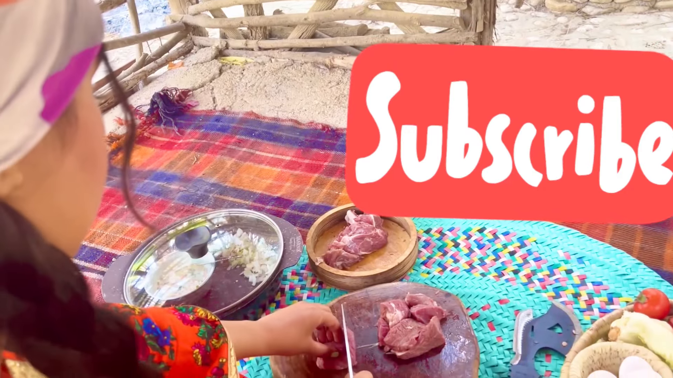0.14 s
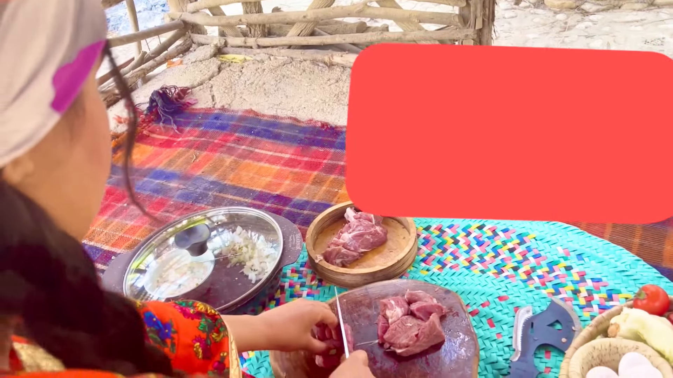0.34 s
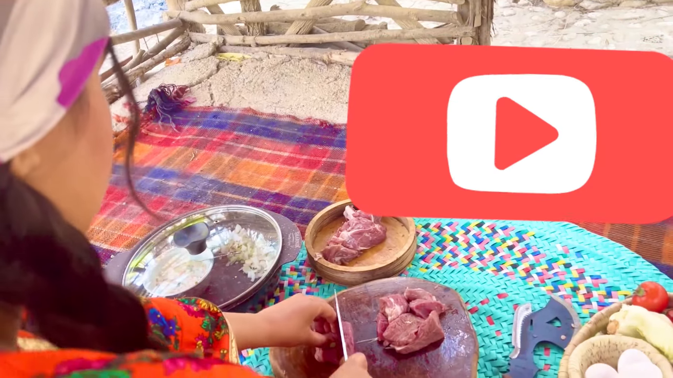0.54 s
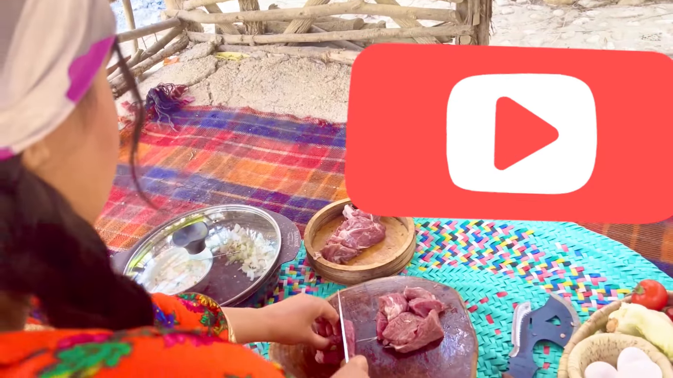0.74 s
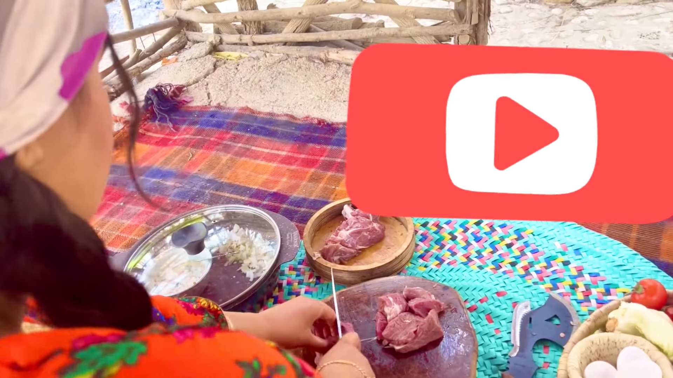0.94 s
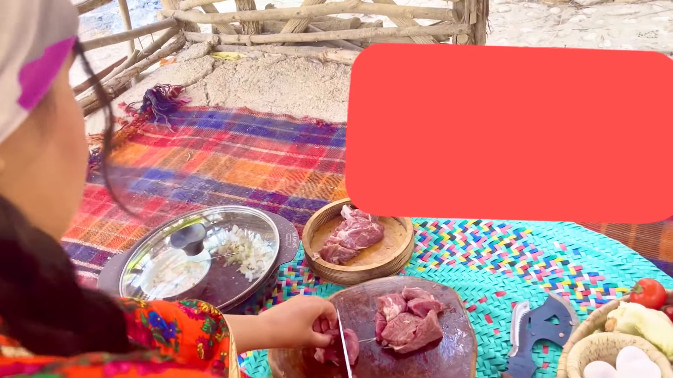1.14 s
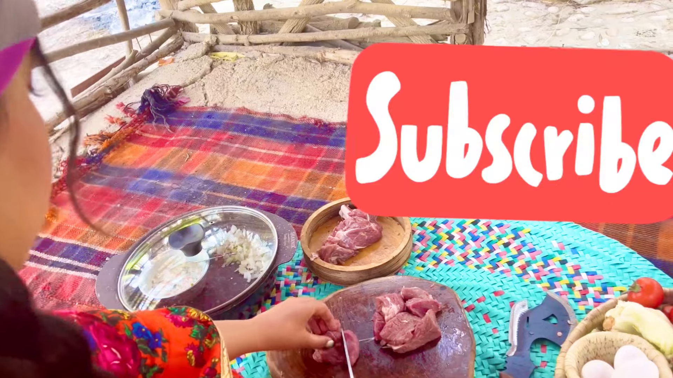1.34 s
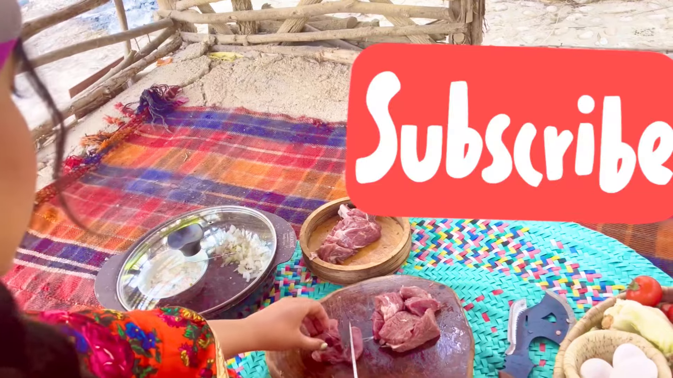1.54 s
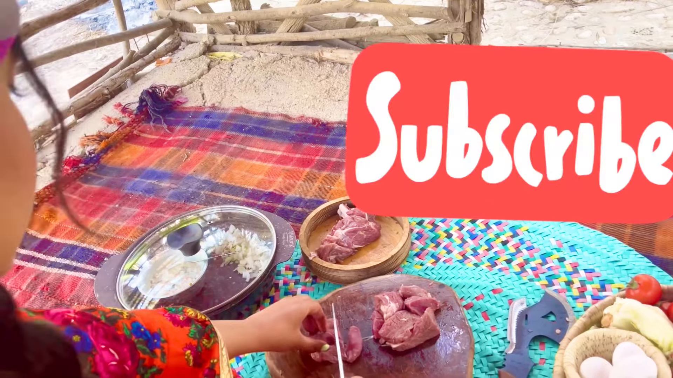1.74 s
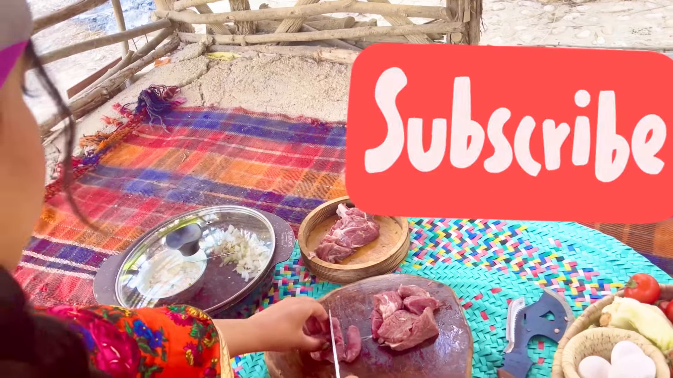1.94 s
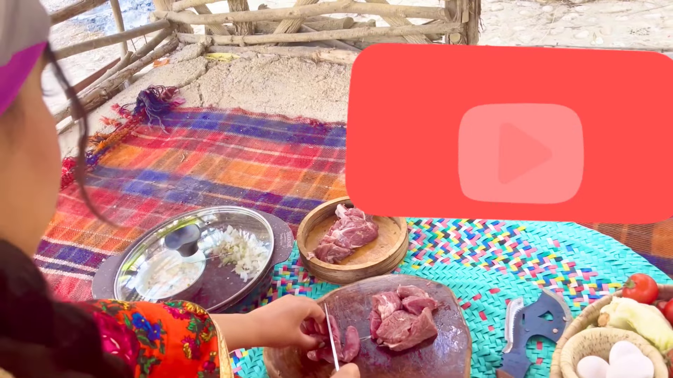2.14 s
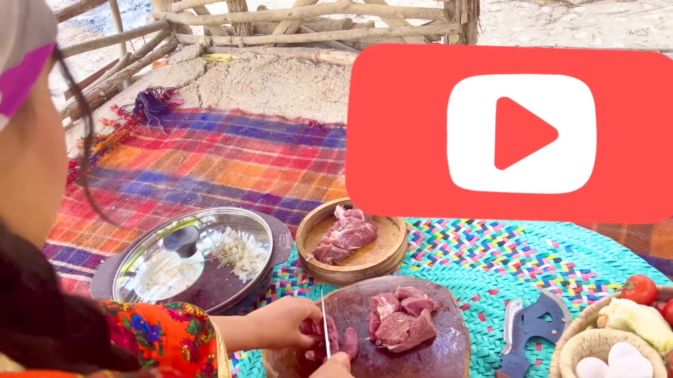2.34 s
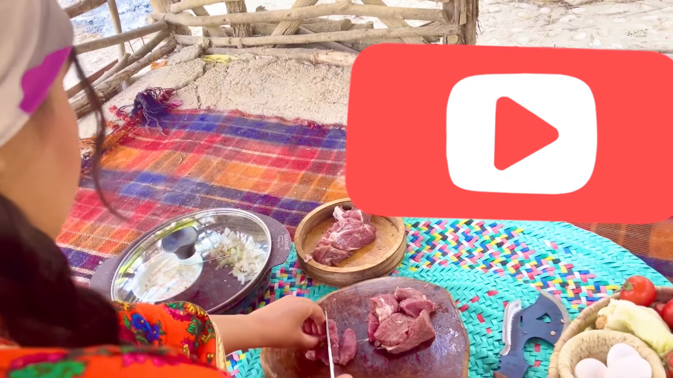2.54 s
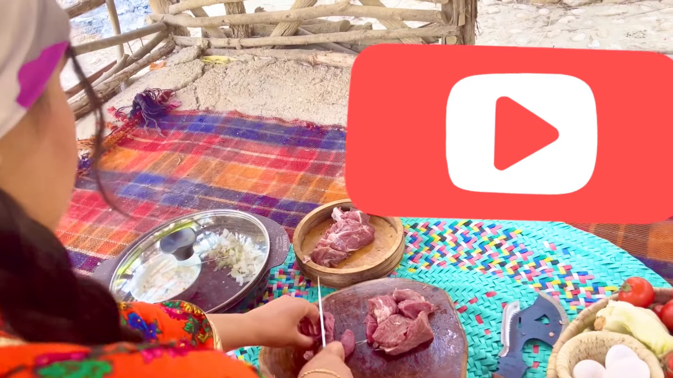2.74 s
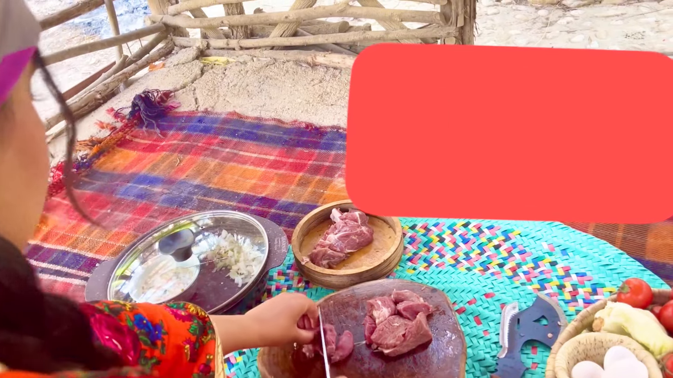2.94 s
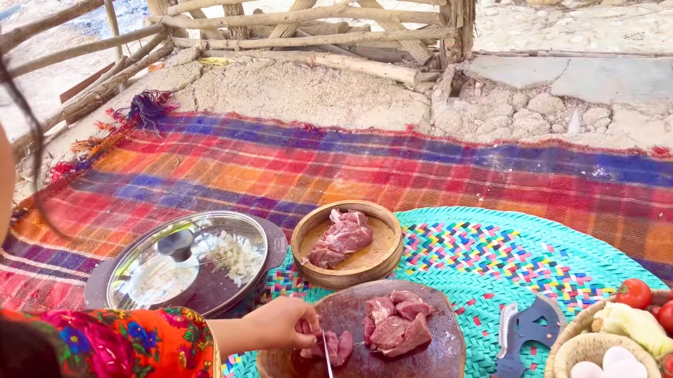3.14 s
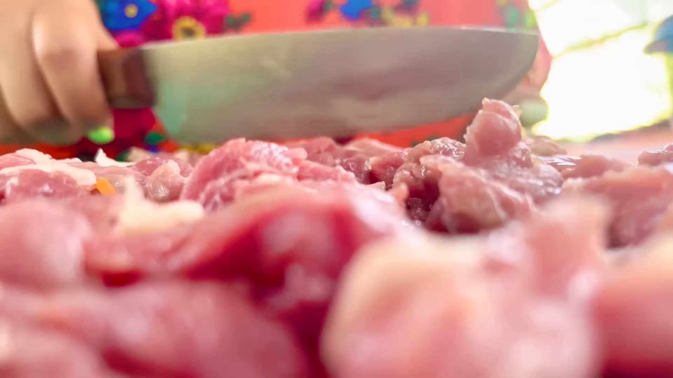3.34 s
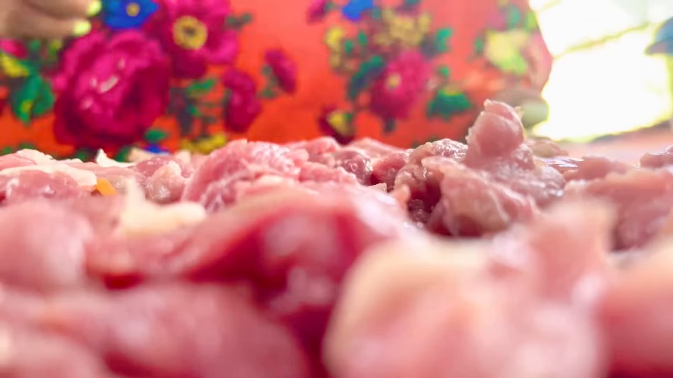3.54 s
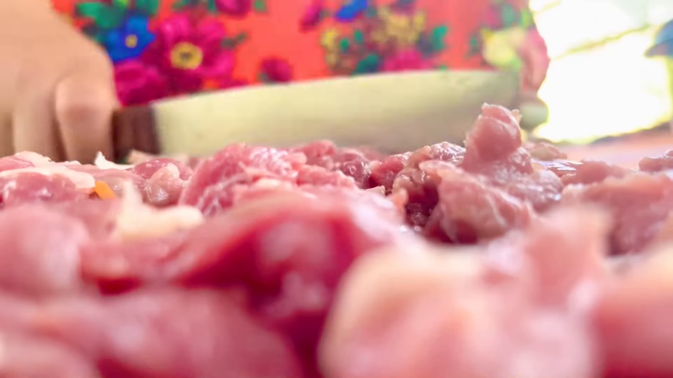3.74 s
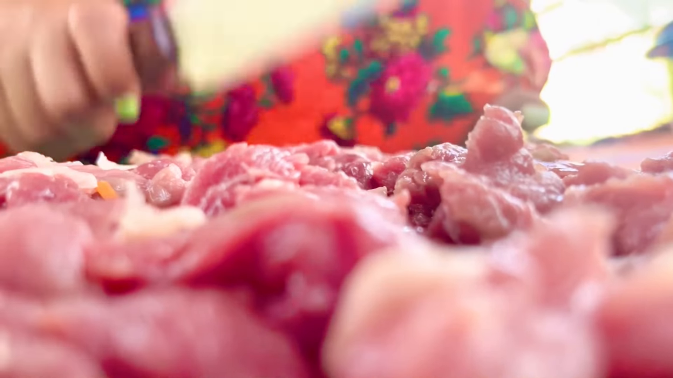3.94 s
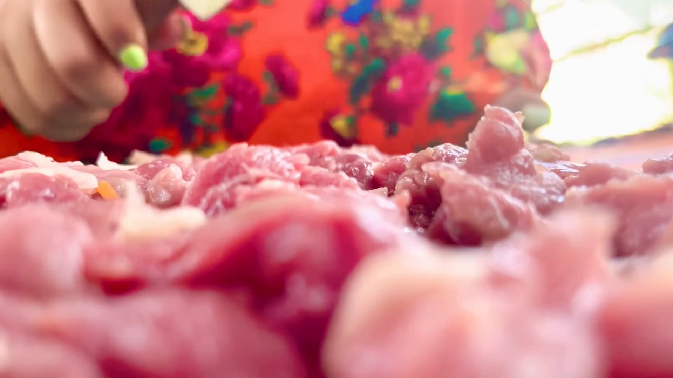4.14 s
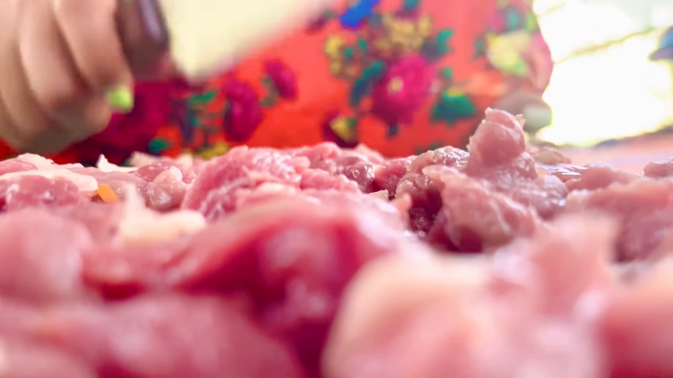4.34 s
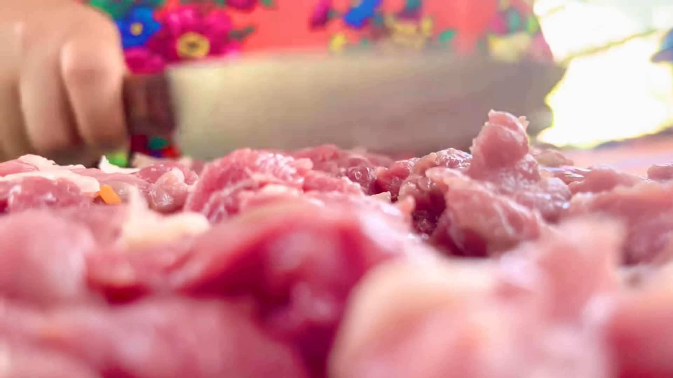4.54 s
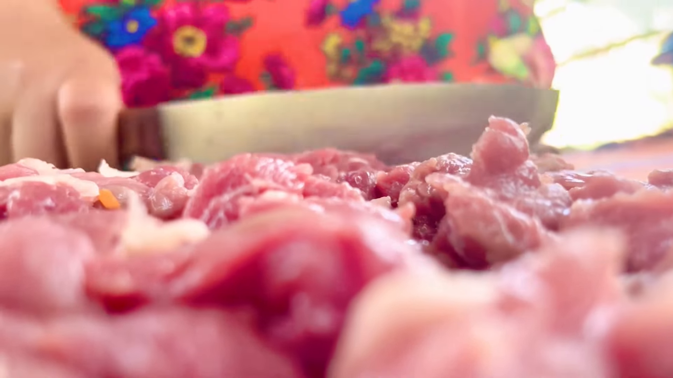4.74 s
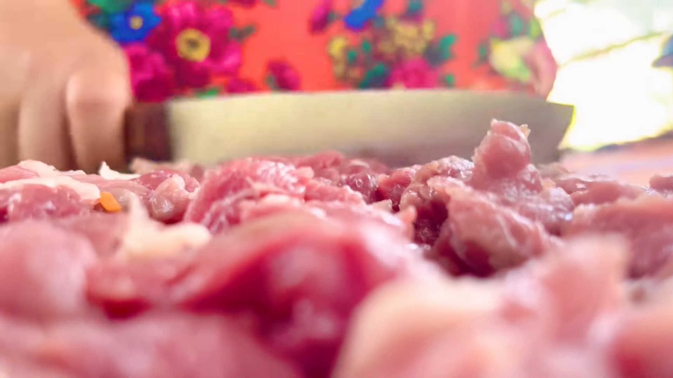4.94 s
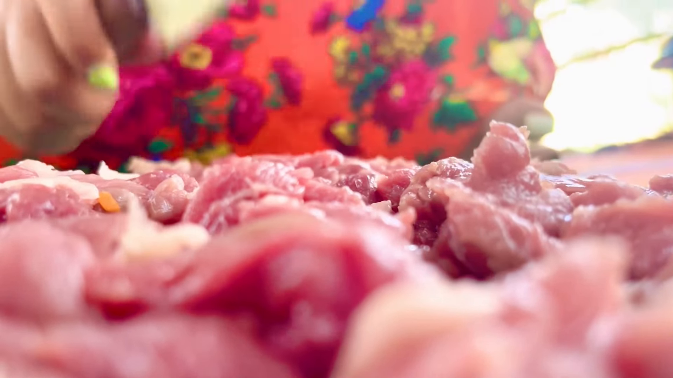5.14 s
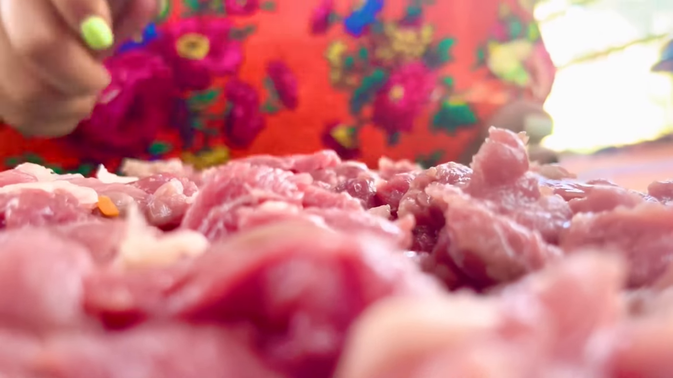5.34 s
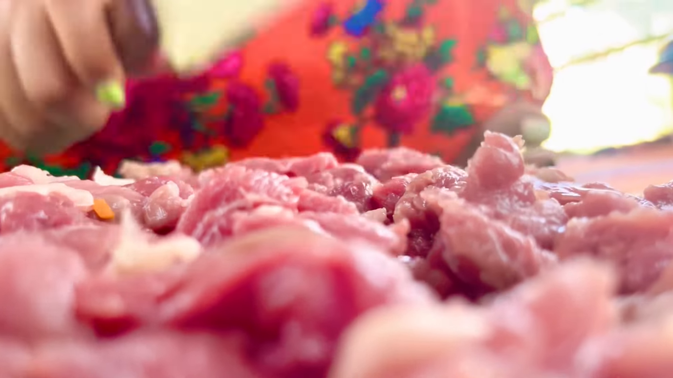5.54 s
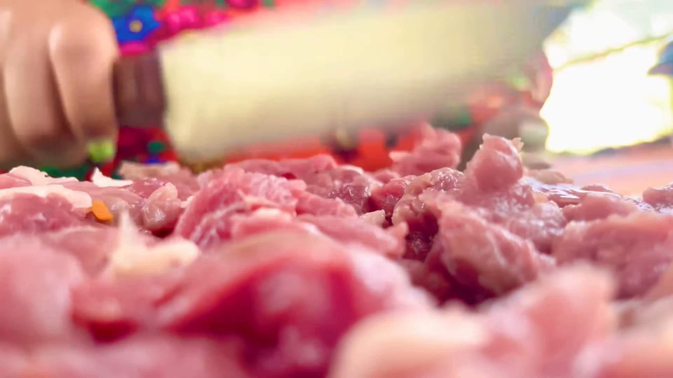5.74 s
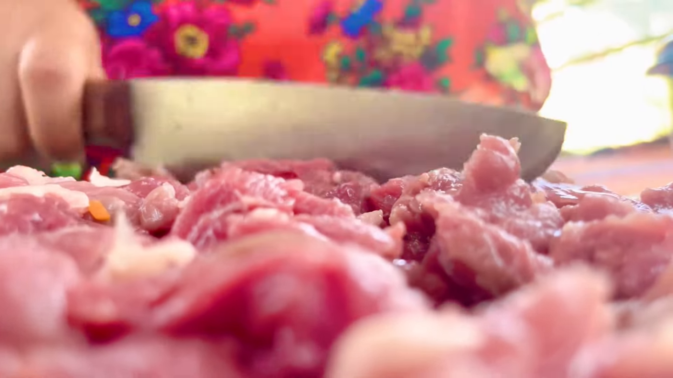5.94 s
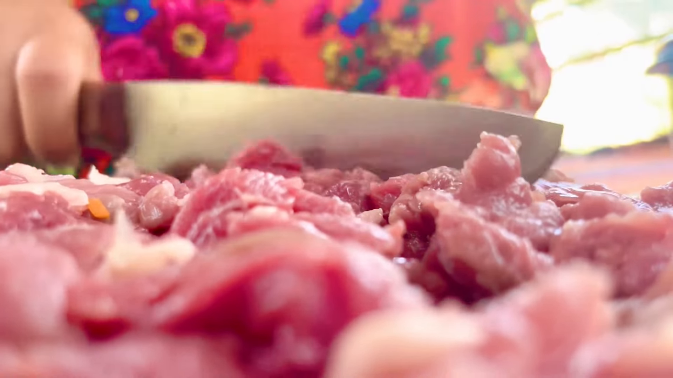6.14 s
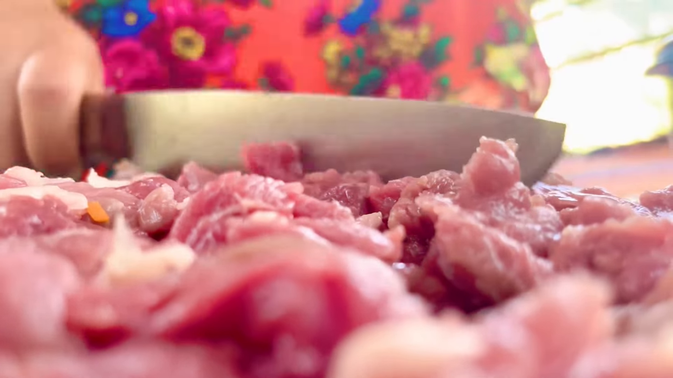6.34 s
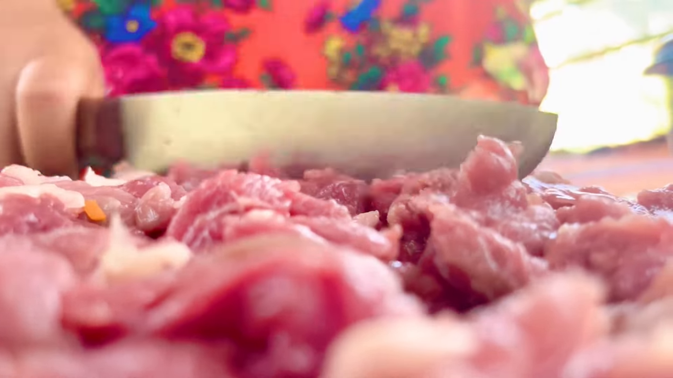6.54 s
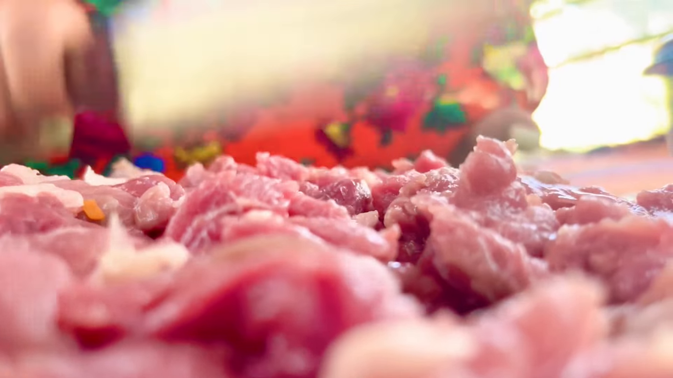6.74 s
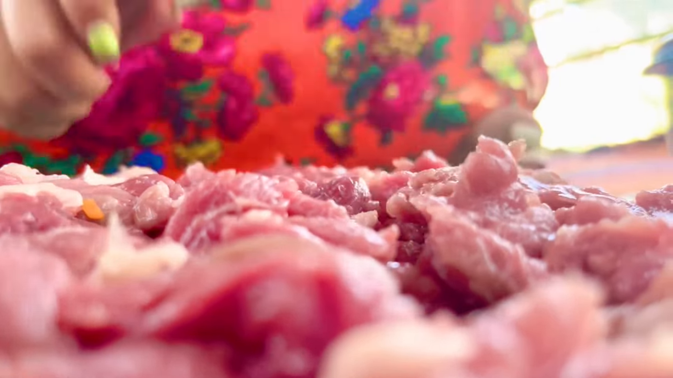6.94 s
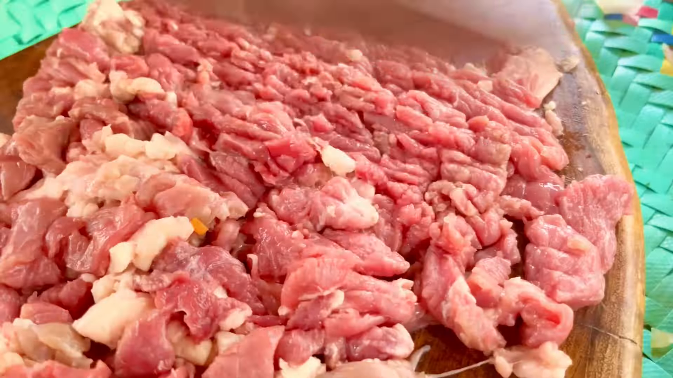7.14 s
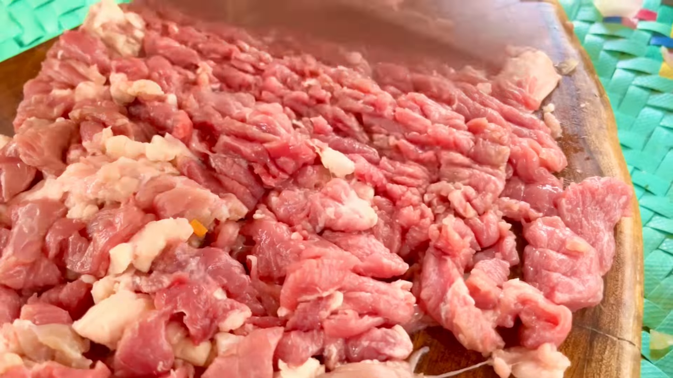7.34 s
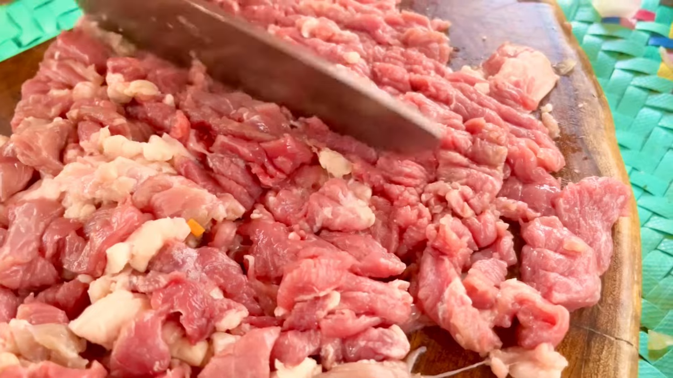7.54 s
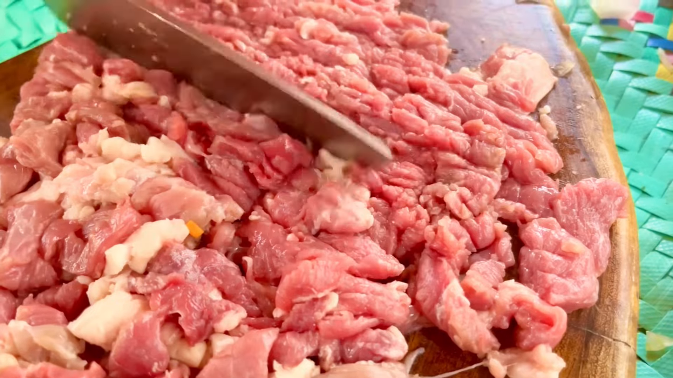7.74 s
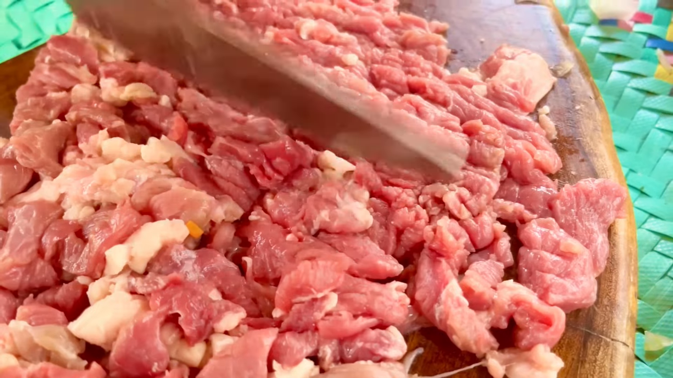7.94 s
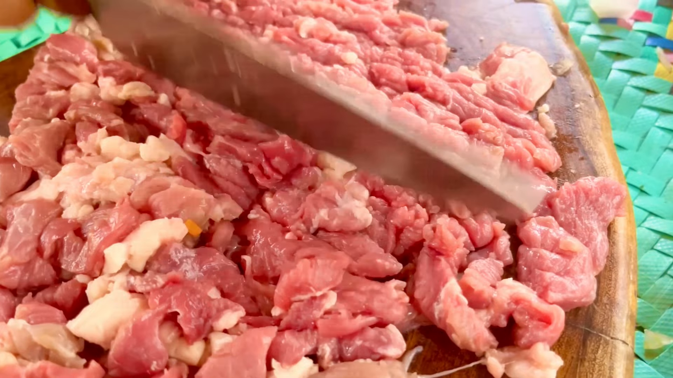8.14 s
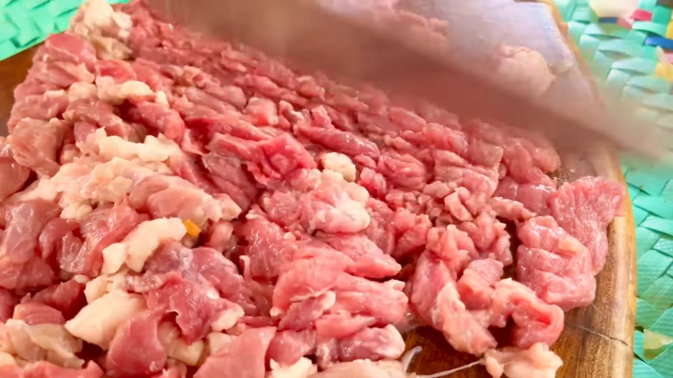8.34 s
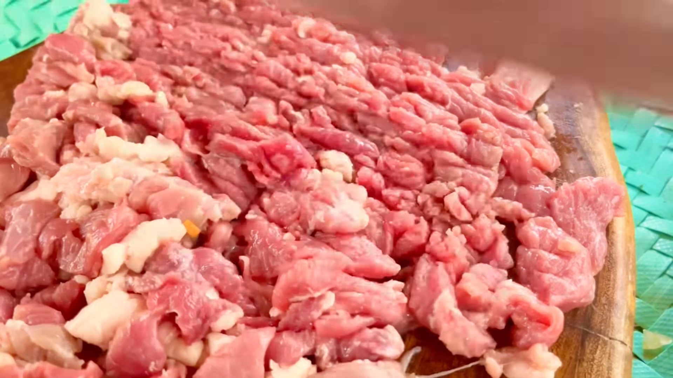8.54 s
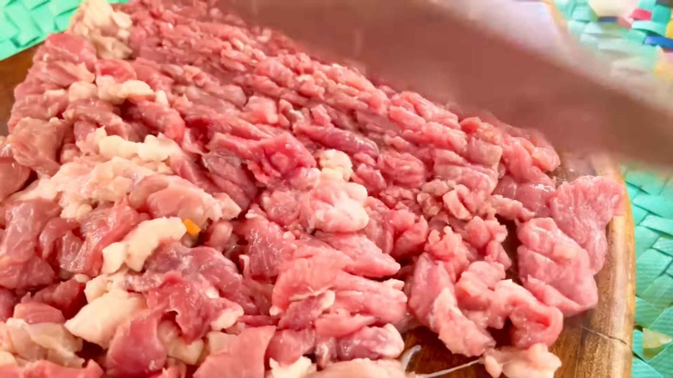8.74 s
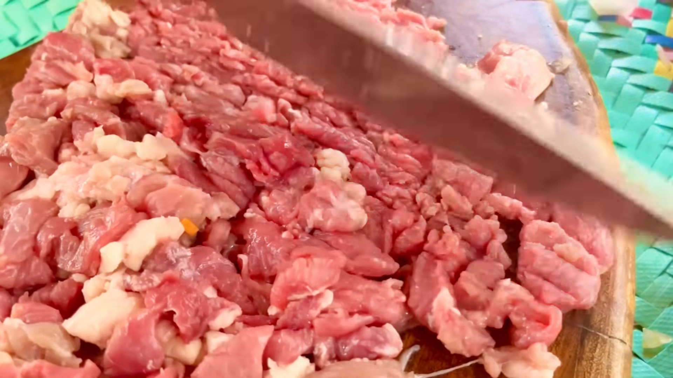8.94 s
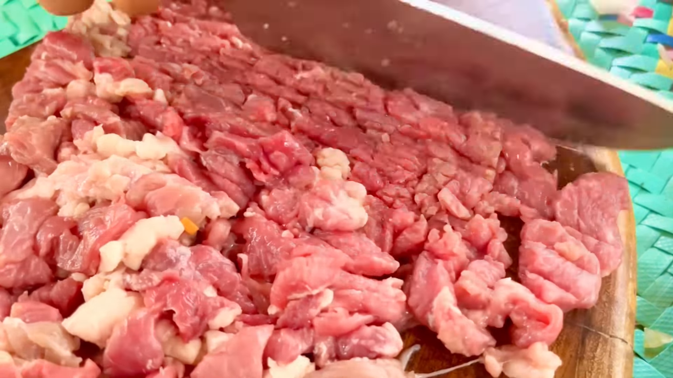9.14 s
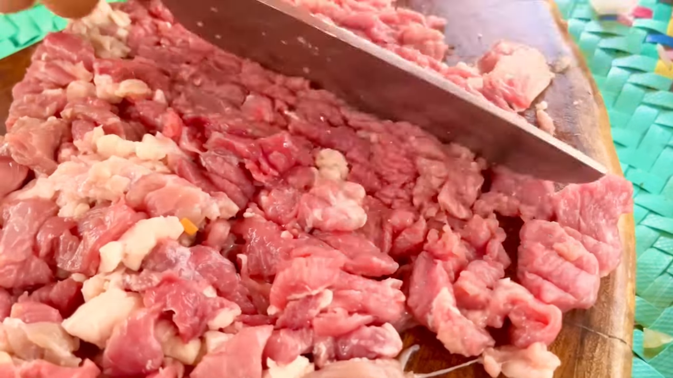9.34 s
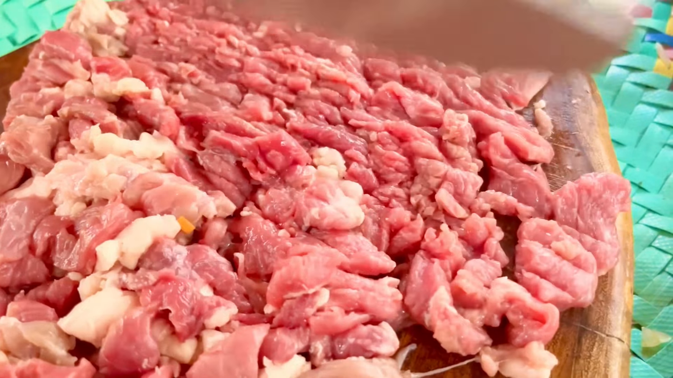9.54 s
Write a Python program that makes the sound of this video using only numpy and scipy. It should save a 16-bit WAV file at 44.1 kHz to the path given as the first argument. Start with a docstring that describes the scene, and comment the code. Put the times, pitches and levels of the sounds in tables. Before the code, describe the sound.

Faint slicing rubs and bird chirps outdoors give way to loud, steady knife chops, some cracking on wood, others thudding softly into wet meat.

```python
"""Knife on a meat board

A big knife saws through raw meat on a thick wooden board, then minces it with quick, even chops.
Some chops reach the wood, whose damped modes knock; others end in the meat with a wet slap of
shaped noise and a low bump of the board on its mat, a falling sine. Strokes are noise driven by blade speed.
A small bird, gliding sines, calls outside the open shelter. Two microphones stand close to the board.
"""
import sys
import numpy as np
from scipy import signal
from scipy.fft import rfft, irfft
from scipy.io import wavfile
from scipy.ndimage import uniform_filter1d

SR = 44100
rng = np.random.default_rng(int(sys.argv[2]) if len(sys.argv) > 2 else 0)


def transcribe(u):
    """Save the signal u as a 16-bit wav file named by the first command-line argument.

    u: samples, shape (n,) or (channels, n), limited to [-1, 1]; the rate is SR.
    q: integer samples, one column per channel.
    """
    v = np.clip(np.atleast_2d(u).T, -1, 1)
    q = np.round(v * 32767).astype(np.int16)
    wavfile.write(sys.argv[1], SR, q)


N = 427769  # samples
HZ = np.fft.rfftfreq(N, 1 / SR)

# All levels are relative: the functions add their own trims. Spectra give dB per Hz.
# gain curve applied to the whole outdoor background: time_s, gain_db
BACKGROUND_GAIN = [(0, -55), (4.1, -57.5), (4.6, -67.5), (6.8, -73.5), (7.4, -64), (9.7, -69.5)]
# spectra of the background's rumble and wash: frequency_hz, level_db
RUMBLE_SPECTRUM = [(12, -36), (20, -6), (43, -1.5), (66, -1), (108, -9.5), (145, -17), (193, -19),
                   (300, -31.5), (390, -62.5), (660, -120)]
WASH_SPECTRUM = [(150, -7.5), (300, 1.5), (700, 2.5), (1400, -7), (2500, -16), (4000, -13.5), (6000, -17),
                 (9500, -20), (12000, -29.5), (16000, -37)]
# likeness of left and right in steady noise: frequency_hz, correlation (0-1)
STEREO_LIKENESS = [(60, 1), (130, 0.25), (290, 0.96), (640, 0.051), (1400, 0.37), (3000, 0)]

# falling bird whistles: start_s, length_s, top_pitch_hz, shoulder_pitch_hz, level_db, run_up_s
BIRD_WHISTLES = [(.143, 0.094, 5170, 3330, -62.5, .004), (1.752, 0.061, 5670, 4040, -59, .04),
                 (1.976, .08, 4770, 3466, -62.5, .004)]
# soft level bird peeps: start_s, length_s, level_db
BIRD_PEEPS = [(0, .035, -71), (.045, 0.037, -68), (0.472, 0.045, -77), (1.914, .05, -71), (3.52, 0.13, -67),
              (3.879, 0.055, -76.5), (5.975, .13, -87), (7.84, 0.11, -79)]
PEEP_HZ = 3890
# a soft run-up climbs to the top pitch: share of pitch gained, level against the whistle in dB
RUN_UP, RUN_UP_DB = 0.25, -13
# slide to the shoulder, then drop: share of the length, bend of the slide, share of pitch lost
SHOULDER_AT, SLIDE_BEND, DROP = 0.8, 1.9, 0.266

# sawing and dragging strokes: middle_s, length_s, hiss_db (blade in meat), rub_db (carried by the board)
KNIFE_STROKES = [(0.33, 0.35, -68, -69.5), (0.568, 0.29, -69, -67.5), (0.829, 0.22, -60, -45),
                 (1.071, 0.3, -57, -43.5), (1.257, 0.62, -66.5, -59), (2.2, 0.35, -68, -70),
                 (2.448, 0.27, -69, -66), (2.673, 0.29, -63, -57), (2.953, 0.36, -59.5, -46),
                 (3.18, 0.46, -77.5, -73.5), (3.485, 0.45, -75, -95), (9.49, 0.22, -68.5, -98)]
# spectra of hiss and rub: frequency_hz, level_db
HISS_SPECTRUM = [(2000, -6), (3200, -5), (4500, -6), (6000, 0), (7300, -5), (8700, 4), (9700, -1),
                 (10400, -11.5), (11300, -2.5), (12500, -26), (15000, -44)]
RUB_SPECTRUM = [(150, -14), (300, -18), (430, -3), (670, 1.5), (780, -11), (900, 3.5), (1200, -5.5),
                (1550, -11), (2340, -12), (3300, -35.5), (4500, -35), (7000, -60)]
HISS_POWER, RUB_POWER = 2.23, 1.94  # amplitude grows as these powers of blade speed
# small snaps of sinew: start_s, peak_db, pitch_hz
SINEW_SNAPS = [(0.4253, -48, 2900), (0.4968, -44, 8530), (0.7137, -46, 8780), (2.688, -44, 8590)]

# chops: landing_s, knock_db, hardness_db_per_octave, crack_db (against the modes),
# bump_db, slap_db, place (on the board, 0-4, rounded when used)
KNIFE_CHOPS = [(0.7867, -42.5, -6.5, -24, -63, -71, -0.5), (0.844, -44, -11, -17, -64, -73, 0),
               (2.026, -59.5, -32, -15, -56, -84, 0), (3.6874, -14, 2.5, -14, -25.5, -28, 0),
               (3.9904, -14, -4, -11.5, -20.5, -39.5, 0), (4.2164, -16, 2, 0, -31.5, -37, 1),
               (4.4643, -18.5, 0.85, -6, -46, -53, 1), (4.7098, -18, 1, -9.5, -47.5, -40.5, 1),
               (4.957, -24.5, -10.5, 2, -38, -52.5, 1), (5.193, -57, -1, -10, -36.5, -47, 1.5),
               (5.426, -17, 0, -10.5, -48, -39, 1), (5.6554, -17.5, 1.5, -6, -49.5, -33.5, 1),
               (5.876, -44.5, -9.5, -6.5, -41.5, -53.5, 1.5), (6.106, -61.5, -1.5, -2, -39.5, -53, 2),
               (6.323, -41, -8, -5.5, -40, -52, 2), (6.5413, -61, -5, -12, -40, -47, 1.5),
               (6.767, -59.5, 0, -10, -39.5, -48, 1), (6.9957, -31.5, -9, -3, -41, -46, 1.5),
               (7.176, -20.5, 1, -13, -48, -54.5, 2), (7.3729, -15.5, 3.5, -12, -47.5, -42, 2),
               (7.5576, -16, 2.5, -10.5, -47.5, -36, 2), (7.7566, -43, -4, -11.5, -39.5, -50, 2.5),
               (7.963, -13.5, 0.5, -7, -49, -44, 2), (8.164, -65, -7, -8, -47.5, -54.5, 4),
               (8.378, -13, 0, -2, -45, -28, 2), (8.5943, -14, -3, 0.5, -50.5, -35, 4),
               (8.789, -28, -4.5, -7.5, -43.5, -48, 4), (8.9654, -20.5, -2.8, -5, -47, -49, 4),
               (9.1391, -15.5, 1.5, -9, -52, -31, 4), (9.325, -61.5, -3, -4, -41, -55.5, 3.5),
               (9.6008, -47.5, -5.5, -11.5, -40.5, -44.5, 2.5)]
# modes of board and blade: pitch_hz, width_hz, left_lead_rad, left_minus_right_db,
# then level_db when struck at each of places 0, 1, 2, 3, 4
BOARD_MODES = [(542, 61, 1.52, 2, -8, -22, -7, 4, -4),
               (564.2, 100, -0.9, -2.5, -10.5, -21.5, -13.5, 1, -11.5),
               (642, 92, -0.5, -3.5, 4.5, -14.5, -8, -1, -12.5),
               (890, 49, -0.5, -4.5, 0.5, -8, 1.5, 3, -14), (982, 110, 0.2, -1.5, 3.5, -14, -7.5, -6, -7.5),
               (1282, 71, 0.92, -4, 1.5, -18, -0.5, -8.5, 3.5),
               (1450, 39, 2, 1.5, -6.5, -15.5, -6, -9, -13), (1677, 46, 3.5, -2.5, -4, 0, 4.5, -4.5, -2.5),
               (1827, 57, 1.05, -4, -11.5, -8.5, -21.5, -0.5, -9),
               (2260, 100, -0.0, 1, -16, -4.5, -10.5, -9.5, -4.5),
               (2506, 69, -2.5, -3.5, -13.5, -1.5, 1.5, -6, -7.5),
               (2900, 200, -5, -6, -21, -22.5, -14.5, -12, -20.5),
               (3494, 100, 4.5, -1, -20.5, -12, -18, -17.5, -12.5),
               (3816, 130, 1.56, -1.5, -24, -9.5, -30, -14, -39),
               (4040, 120, 1.08, -7.5, -23.5, -29, -19, -19.5, -20)]
# spectrum of the dense, quickly damped rest of a knock: frequency_hz, level_db
CRACK_SPECTRUM = [(60, -18.5), (170, -11.5), (350, -2), (700, 0), (1300, 2.5), (2500, 2.5), (3600, -7.5),
                  (4500, -13), (5400, -20), (7000, -24), (10000, -27), (13000, -45.5), (16000, -56)]
# spectrum of wet meat against the blade: frequency_hz, level_db
WET_SPECTRUM = [(300, -11.5), (1500, -13), (3000, -13), (5000, -9.5), (7200, -13), (8400, -1), (9700, -1.5),
                (10400, -15.5), (11200, -8.5), (13000, -27.5), (16000, -40.5)]
# spectrum of the soft push of a blow through meat and board: frequency_hz, level_db
THUD_SPECTRUM = [(60, -13.5), (150, -2.5), (260, 1.5), (400, -5), (600, -13.5), (1000, -33), (2500, -56),
                 (8000, -79.5)]
# depth of the meat at places 0-4, as the time a soft chop needs to pass it: time_s
MEAT_DEPTH = [.011, .001, .0025, .001, .004]
# thud level: base dB, then dB per dB of knock and of bump
THUD_DB, THUD_PER_KNOCK, THUD_PER_BUMP = -6.5, 0.35, 0.52
LIFT_S, LIFT_SPREAD_S = 0.04, 0.01  # wait until the blade lifts: mean, standard deviation

# decay by 60 dB among mat and low walls, and in the yard: frequency_hz, decay_s
NEAR_DECAY = [(100, 0.091), (400, 0.18), (1200, 0.14), (3000, 0.11), (5000, .12), (9000, 0.11),
              (14000, 0.021)]
FAR_DECAY = [(100, .3), (600, 0.52), (1500, 0.53), (2500, 0.6), (4000, .7), (6000, .35), (12000, 0.2)]
# close reflections: delay_s, level_db
CLOSE_ECHOES = [(.0085, -30), (0.013, -21.5), (0.0158, -23.5), (.028, -28.5), (.034, -35.5)]
EDGE_HZ = 16000  # upper band limit


def amp(db):
    """Decibels are twenty times the logarithm of amplitude."""
    return 10 ** (np.asarray(db) / 20)


def unit(x):
    """Normalization to an rms of 1."""
    return x / np.sqrt(np.mean(x ** 2) + 1e-20)


def blow(x):
    """Level normalization: a short sound is scaled to an rms of about 30, the square root of the number of
    samples in 20 ms."""
    return x / np.sqrt(np.sum(x ** 2) / len(x) / (0.02 * SR) + 1e-20)


def read(points, hz):
    """Interpolation of a curve along logarithmic frequency."""
    f, value = np.transpose(points)
    return np.interp(np.log(hz + 1), np.log(f + 1), value)


def add(mix, s, sound):
    """Superposition: a sound is summed into the mix from s seconds on."""
    part = mix[:, round(s * SR):][:, :sound.shape[1]]
    part += sound[:, :part.shape[1]]


def pan(db):
    """Level difference between the channels: left minus right, shared equally."""
    return amp([[db / 2], [-db / 2]])


def colour(x, gain_db):
    """Minimum-phase filtering: a causal response follows from the gain over frequency alone."""
    log_gain = np.log(amp(gain_db(abs(np.fft.fftfreq(2048, 1 / SR)))))
    response = np.exp(np.conj(signal.hilbert(log_gain)))
    taps = np.fft.ifft(response).real[:len(log_gain) // 2]
    return signal.fftconvolve(x, taps[None], axes=1)[:, :x.shape[1]]


def noise(spectrum):
    """Partial coherence: stereo noise of rms 1 mixes a shared part with an independent one."""
    a, b = rfft(rng.standard_normal((2, N)))
    same = np.clip(read(STEREO_LIKENESS, HZ), -1, 1)
    right = same * a + np.sqrt(1 - same ** 2) * b
    return unit(irfft(np.array([a, right]) * amp(read(spectrum, HZ)), N))


def bend(x, delay_s=0.0022):
    """Dispersion: bending waves speed up as the root of pitch, up to 4 kHz, so treble arrives first."""
    size = 2 * x.shape[1]
    f = np.minimum(np.fft.rfftfreq(size, 1 / SR), 4000)
    turns = delay_s * (2 * np.sqrt(1000 * f) - f / 2)
    return irfft(rfft(x, size) * np.exp(-2j * np.pi * turns), size)[:, :size // 2]


def air(wash_db=-14.0):
    """Gain envelope: one gain curve scales a low outdoor rumble and a faint wash alike."""
    s, db = np.transpose(BACKGROUND_GAIN)
    gain = amp(np.interp(np.arange(N) / SR, s, db))
    return (noise(RUMBLE_SPECTRUM) + amp(wash_db) * noise(WASH_SPECTRUM)) * gain


def note(hz, db, waver, soft_ends):
    """Frequency modulation: one thin bird note along a pitch curve, slightly hoarse from random waver."""
    pitch = hz * (1 + waver * unit(uniform_filter1d(rng.standard_normal(len(hz)), size=50)))
    tone = np.sin(2 * np.pi * np.cumsum(pitch) / SR)
    return pan(-2.4) * amp(db) * tone * signal.windows.tukey(len(hz), soft_ends)


def bird():
    """Gliding tones: whistles slide to a shoulder and drop away, with soft level peeps besides."""
    out = np.zeros((2, N))
    for s, length, top_hz, shoulder_hz, db, run_s in BIRD_WHISTLES:
        left = np.linspace(1, 0, int(run_s * SR))  # share of the run-up still to go
        run_hz = top_hz * (1 - RUN_UP * left ** 2)
        add(out, s - run_s, note(run_hz, db + RUN_UP_DB, waver=0.022, soft_ends=0.28))
        u = np.arange(0, length, 1 / SR) / length
        slide = np.maximum(1 - u / SHOULDER_AT, 0) ** SLIDE_BEND
        drop = np.interp(u, [SHOULDER_AT, 1], [0, DROP])
        fall_hz = (shoulder_hz + (top_hz - shoulder_hz) * slide) * (1 - drop)
        add(out, s, note(fall_hz, db, waver=0.036, soft_ends=0.27))
    for s, length, db in BIRD_PEEPS:
        add(out, s, note(np.full(int(length * SR), PEEP_HZ), db, waver=0.03, soft_ends=0.48))
    return out


def slicing(hiss_db=0.2, rub_db=-1.8, grain_db=0.9):
    """Friction noise grows with blade speed; fibres part unevenly and the board carries the lower rub."""
    uneven = unit(uniform_filter1d(rng.standard_normal(N), size=420))  # smoothed over 9.5 ms
    grain = unit(amp(grain_db * uneven))
    hiss = noise(HISS_SPECTRUM) * pan(-4.0)
    rub = noise(RUB_SPECTRUM) * pan(-3.5) * grain
    out = np.zeros((2, N))
    for middle, length, high_db, low_db in KNIFE_STROKES:
        first = max(int((middle - length / 2) * SR), 0)
        i = np.arange(first, min(int((middle + length / 2) * SR), N))
        speed = np.maximum(np.cos(np.pi * (i / SR - middle) / length), 0)
        out[:, i] += hiss[:, i] * amp(hiss_db + high_db) * speed ** HISS_POWER
        out[:, i] += rub[:, i] * amp(rub_db + low_db) * speed ** RUB_POWER
    return out


def snaps(snap_db=-3, fade_s=0.0016):
    """Sudden release of tension: single fibres let go with a tick of decaying, band-shaped noise."""
    out, t = np.zeros((2, N)), np.arange(SR // 100) / SR
    for s, db, hz in SINEW_SNAPS:
        burst = rng.standard_normal((2, len(t))) * np.exp(-t / fade_s)
        tick = colour(burst, lambda f: -14 * abs(np.log2((f + 100) / hz)))
        add(out, s, amp(db + snap_db) * tick / abs(tick).max())
    return out


def slap(swell_s=0.0007, fade_s=0.0013):
    """Transient flow noise: juice squirts as the blade enters; the burst peaks 10 ms after its start."""
    t = np.arange(int(0.04 * SR)) / SR - 0.01
    burst = rng.standard_normal((2, len(t))) * np.exp(np.minimum(t / swell_s, -t / fade_s))
    return blow(colour(burst, lambda f: read(WET_SPECTRUM, f)))


def squeeze(seconds, hardness):
    """Fracture noise: the edge crushes fibres on its way down, swelling until the wood stops it."""
    t = np.arange(int((seconds + 0.01) * SR)) / SR
    swell = np.where(t < seconds, (t / seconds) ** 2, 0)
    crunch = rng.standard_normal((2, len(t))) * swell

    def gain_db(f):
        return read(CRACK_SPECTRUM, f) + (hardness - 2) * np.log2(np.clip(f, 650, 5500) / 1500)
    return blow(colour(crunch, gain_db))


def knock(place, hardness, crack_db, crack_s=0.0027, rise_s=0.001, damping=1.05):
    """Modal excitation: the edge bites the wood, its place picks the modes, and meat under it dulls them."""
    t = np.arange(int(0.09 * SR)) / SR
    ring = np.zeros((2, len(t)))
    for hz, width, lead, side_db, *place_db in BOARD_MODES:
        loaded_hz = hz * (1 + 0.01 * rng.standard_normal())  # pitch varies from chop to chop
        phase = 2 * np.pi * loaded_hz * t + np.array([[lead], [-lead]]) / 2
        decay = np.exp(-np.pi * width * damping * t)
        ring += amp(place_db[place]) * pan(side_db) * width * decay * np.sin(phase)
    shared, left, right = rng.standard_normal((3, len(t))) * np.exp(-t / crack_s)
    burst = shared + 2.7 * np.array([left, right])
    crack = colour(burst, lambda f: read(CRACK_SPECTRUM, f)) * pan(-1.7)
    wood = (blow(ring) + amp(crack_db) * blow(crack)) * (1 - np.exp(-t / rise_s))
    tilted = colour(wood, lambda f: hardness * np.log2(np.clip(f, 650, 5500) / 1500))
    return blow(bend(tilted))


def thud(fade_s=0.022, scatter=0.027):
    """Impulse response: the weight of the blow is one soft push, then a dull shudder of meat and board."""
    t = np.arange(int(0.12 * SR)) / SR
    shudder = scatter * rng.standard_normal((2, len(t))) * np.exp(-t / fade_s)
    push = shudder + (t == 0)
    return blow(bend(colour(push, lambda f: read(THUD_SPECTRUM, f)))) * pan(-3)


def bump(rest_hz=56, extra_hz=160, settle_s=0.008, fade_s=0.032, rise_s=0.011):
    """Mass on a spring: the board sinks into the mat and rocks, its pitch falling as it settles."""
    left_lag_s = 0.0016
    t = np.maximum(np.arange(int(0.25 * SR)) / SR - np.array([[left_lag_s], [0]]), 0)
    hz = rest_hz * rng.uniform(0.8, 1.15)
    turns = hz * t + extra_hz * settle_s * (1 - np.exp(-t / settle_s))
    return blow(np.sin(2 * np.pi * turns) * np.exp(-t / fade_s) * (1 - np.exp(-t / rise_s)))


def peel(spread_s=0.012, pops_per_s=320, fizz=0.065):
    """Adhesive release: the rising blade leaves sticky meat in tiny pops, thickest 45 ms after the start."""
    t = np.arange(int(0.14 * SR)) / SR - 0.045
    strength = amp(1.8 * np.minimum(rng.exponential(1, len(t)), 4))
    pops = (rng.random(len(t)) < pops_per_s / SR) * strength
    crackle = (pops + fizz) * rng.standard_normal((2, len(t))) * np.exp(-(t / spread_s) ** 2 / 2)
    tilt = [(2000, -10.0), (7500, 0.5)]  # Hz, dB
    return blow(colour(crackle, lambda f: read(WET_SPECTRUM, f) + read(tilt, f)))


def chopping(knock_db=1, bump_db=0, slap_db=-1, squeeze_db=-22, peel_db=-64, cut_s=0.0042):
    """Impact in stages: each chop is a slap, a crunch, a knock, a thud, a bump and a peel."""
    out = np.zeros((2, N))
    for s, wood_db, hardness, crack_db, low_db, wet_db, place in KNIFE_CHOPS:
        place = int(np.clip(round(place), 0, 4))
        # the softer the chop, the longer the edge travels through meat before it lands
        ahead = MEAT_DEPTH[place] * np.clip(0.4 - hardness / 5, 0, 1)
        lift = LIFT_S + LIFT_SPREAD_S * rng.standard_normal()
        thud_db = THUD_DB + THUD_PER_KNOCK * wood_db + THUD_PER_BUMP * low_db
        add(out, s - ahead - 0.01, amp(wet_db + slap_db) * slap())  # peaks on entering the meat
        add(out, s - ahead - cut_s, amp(wood_db + squeeze_db) * squeeze(ahead + cut_s, hardness))
        add(out, s - 0.0008, amp(wood_db + knock_db) * knock(place, hardness, crack_db))
        add(out, s, amp(thud_db) * thud())
        add(out, s, amp(low_db + bump_db) * bump())
        add(out, s + lift - 0.045, amp(min(peel_db, wet_db)) * peel())  # thickest at the lift
    return out


def reverb(x, t60, build_s):
    """Diffuse reverberation: a noise tail builds up briefly, each band dying at its own speed."""
    hz, t, z = signal.stft(rng.standard_normal((2, SR)), SR, nperseg=256)
    z = z * amp(-60 * t / read(t60, hz)[:, None]) * (1 - np.exp(-(t / build_s) ** 2))
    tail = signal.istft(z, SR, nperseg=256)[1]
    return signal.fftconvolve(x, tail / np.linalg.norm(tail[0]), axes=1)[:, :N]


def shelter(x, near_db=-30.0, far_db=-46):
    """Reflection: a few close echoes, a short tail from the shelter and a faint long one from the yard."""
    out = amp(near_db) * reverb(x, NEAR_DECAY, 0.027) + amp(far_db) * reverb(x, FAR_DECAY, 0.033)
    for delay, db in CLOSE_ECHOES:
        add(out, delay, amp(db) * x[::-1])  # echoes swap left and right
    return out


def scene():
    """Direct and reflected sound: knife work close by; the far bird's song and a slightly weaker yard reverb."""
    song = bird()
    far_song = song + amp(-3.0) * reverb(song, FAR_DECAY, 0.011)
    knife = snaps() + chopping()
    return air() + far_song + slicing() + knife + shelter(knife)


def record(dry, ceiling=1.8):
    """Saturation: overload rounds off the hardest knocks; then a low-pass limits the band."""
    held = dry / (1 + (dry / ceiling) ** 6) ** (1 / 6)
    low_pass = signal.firwin(255, EDGE_HZ, window=("kaiser", 9), fs=SR)
    return signal.oaconvolve(held, low_pass[None], "same")


dry = scene()
out = record(dry)
transcribe(out)
```